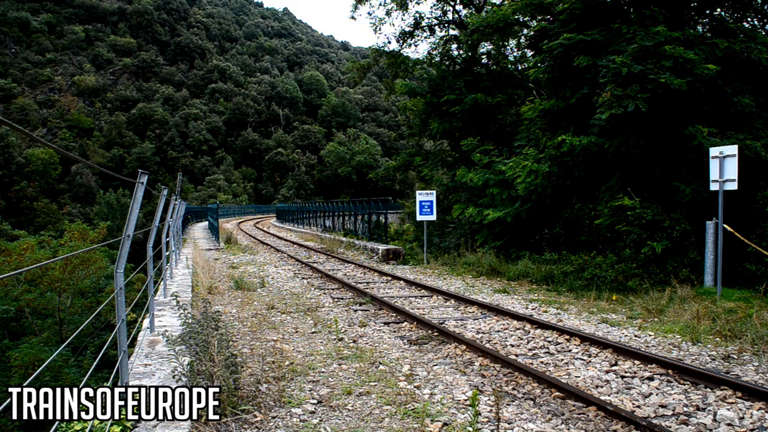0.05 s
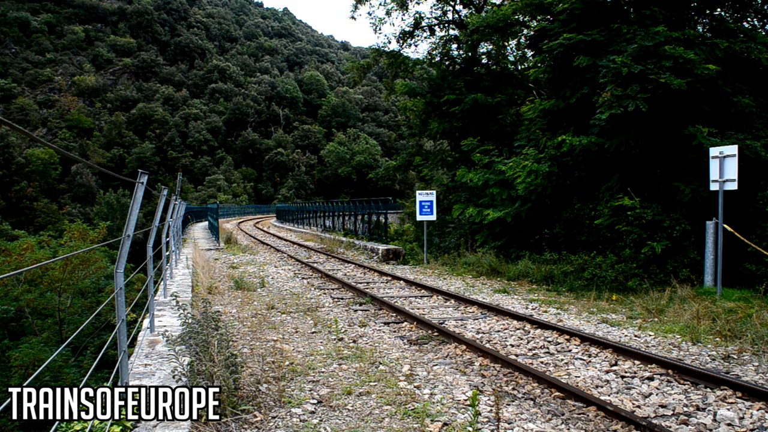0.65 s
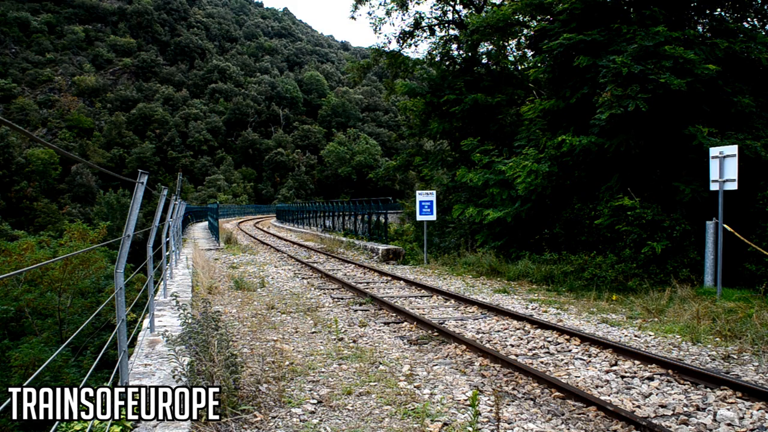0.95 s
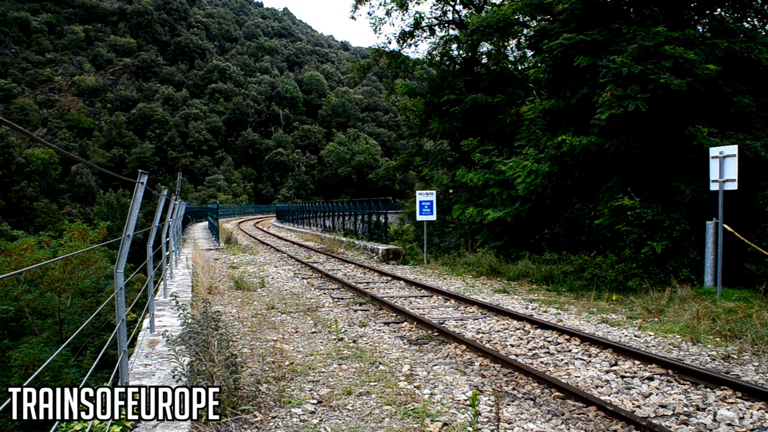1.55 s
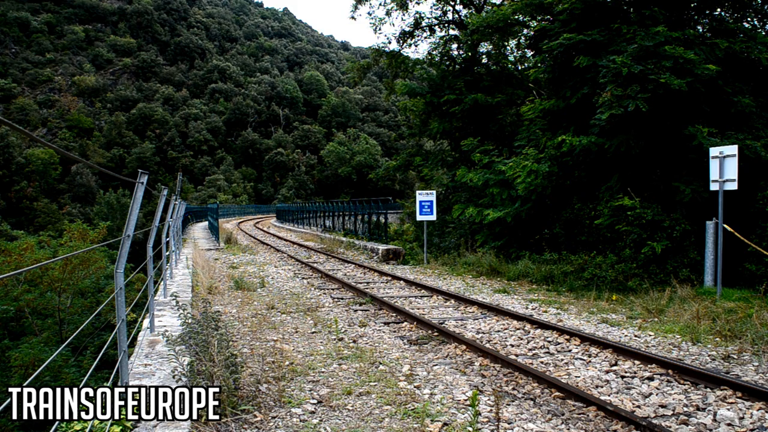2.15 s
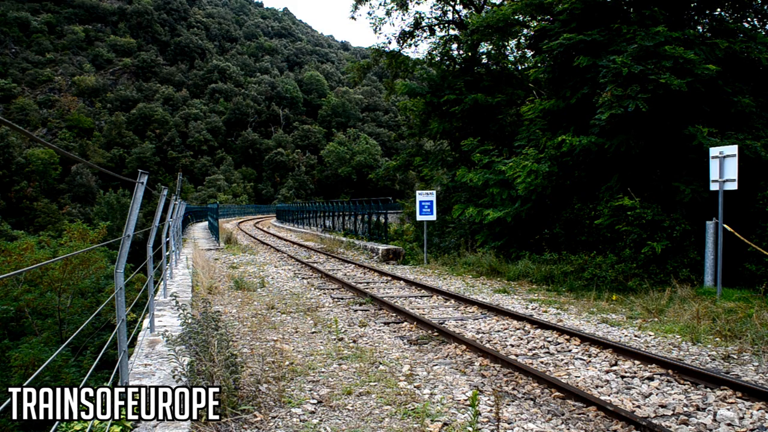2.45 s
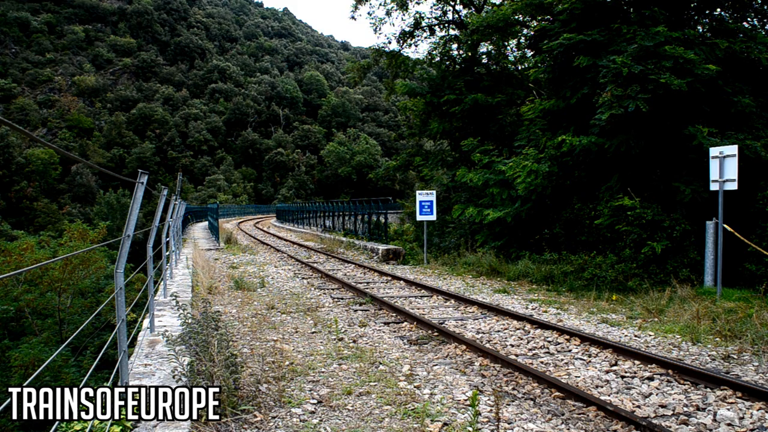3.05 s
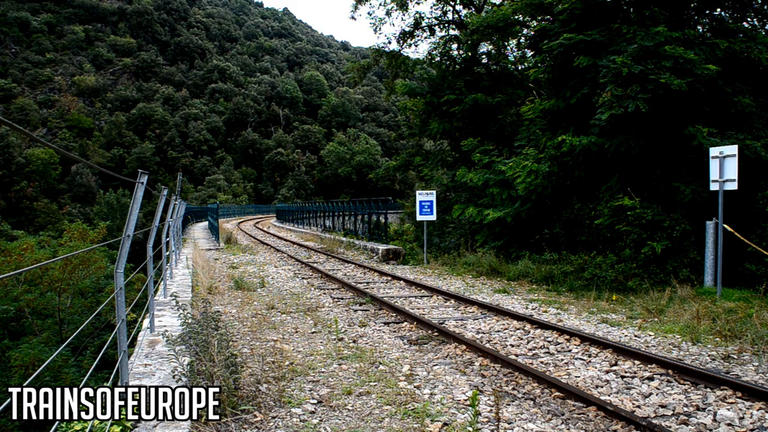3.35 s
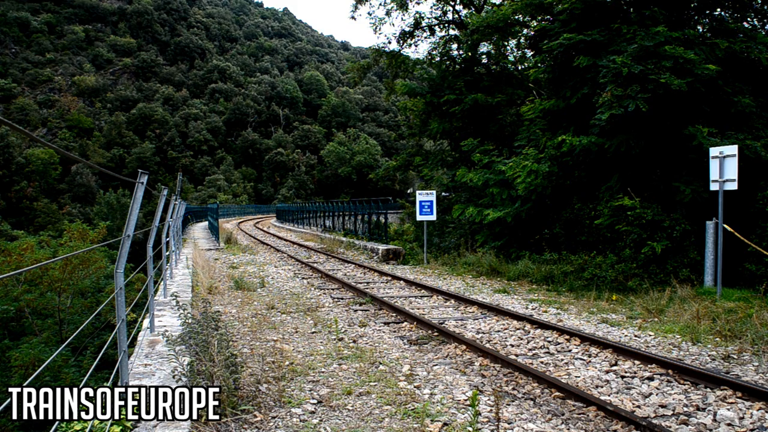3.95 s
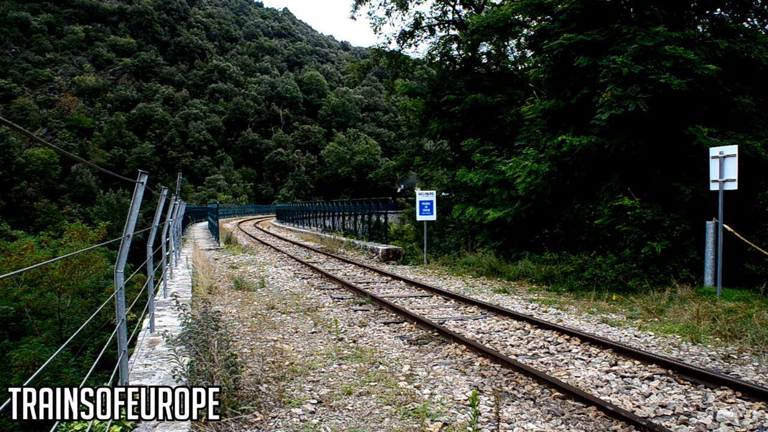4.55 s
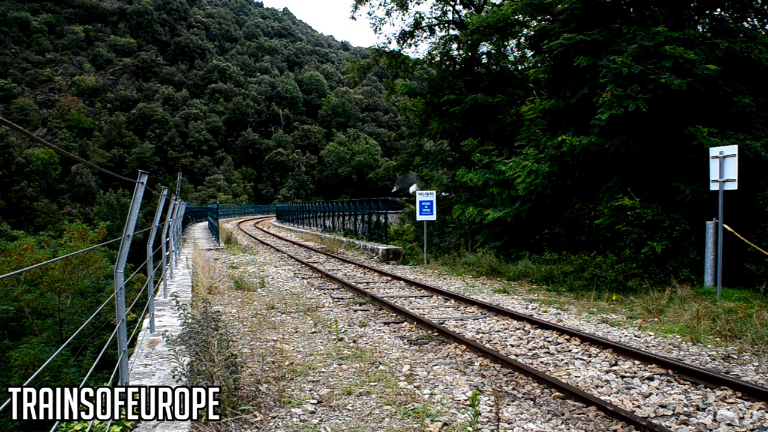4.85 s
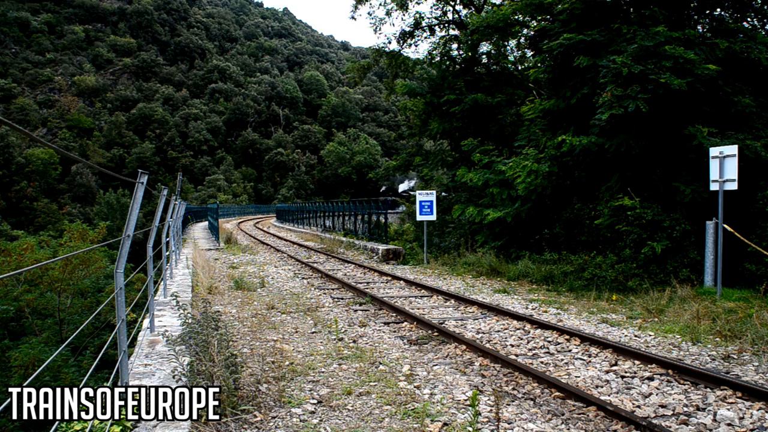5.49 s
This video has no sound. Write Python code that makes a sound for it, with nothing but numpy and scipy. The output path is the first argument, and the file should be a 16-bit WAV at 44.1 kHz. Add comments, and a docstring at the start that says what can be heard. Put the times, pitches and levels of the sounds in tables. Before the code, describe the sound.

From a fixed spot by an outdoor track, a distant steam train is heard as a low, throbbing rumble with rolling wheels and faint, regular metal clanks. It slowly grows louder, and five hissing puffs of steam follow a little past halfway. The locomotive then blows a single, much louder whistle blast, wrapped in rushing steam and wavering with the valley's echo, which lasts to the end.

```python
"""A steam locomotive comes nearer along a wooded valley. First it rumbles, throbs and clanks faintly about
twice a second. From 3.3 s its cylinders let out five puffs of steam over a growing leak. At 4.7 s a steam
jet strikes the whistle's bell (its hollow tube) and blows one long, breathy blast that lasts to the end.
The hillsides echo the moving whistle at a lower pitch (the Doppler effect), so the tone beats, or pulses."""
import sys
import numpy as np
from scipy import signal
from scipy.fft import rfft, irfft, next_fast_len
from scipy.io import wavfile
from scipy.ndimage import uniform_filter1d, minimum_filter1d, map_coordinates

SR = 44100
rng = np.random.default_rng(int(sys.argv[2]) if len(sys.argv) > 2 else 0)


def unload_audio(sound):
    """Save the sound as a 16-bit wav file, at the path given as the first command line argument."""
    columns = np.transpose(np.atleast_2d(sound))
    # keep every value between -1 and 1, then stretch to whole-number steps
    steps = np.round(np.clip(columns, -1, 1) * 32767)
    wavfile.write(sys.argv[1], SR, steps.astype(np.int16))


N = 252252

# How strong each noise is from low to high pitch: f/Hz, relative level/dB
AIR_SPECTRUM = [(3000, 0), (17000, -2)]  # outdoor hiss
RUMBLE_SPECTRUM = [(15, -59), (25, -45), (52, -11.5), (86, -11), (145, -5), (188, -1), (226, -4.5),
                   (265, -2.5), (319, -10), (480, -22), (620, -33), (1060, -120)]  # the running train
ROLLING_SPECTRUM = [(200, -14), (350, 1), (450, -4), (620, 0.5), (760, -4), (980, -1.5), (1150, -5.5),
                    (1500, -7), (2000, -12), (3000, -15), (3750, -19), (4300, -28), (5000, -36),
                    (9000, -53)]  # rolling wheels
CLANK_SPECTRUM = [(300, -18), (1050, 8), (1700, 3.5), (2600, -4), (3900, -11), (5000, -27), (7500, -35),
                  (12000, -50)]  # clanking metal
GUSH_SPECTRUM = [(400, -10.5), (650, -6.5), (1300, -1.5), (2200, -1), (2900, 0), (3700, -1.5), (4300, -8),
                 (5000, -14), (6000, -23), (8000, -55)]  # steam from the cylinders
HISS_SPECTRUM = [(3000, -10), (4200, 7.5), (5000, 4.5), (6500, 1), (8000, -4.5), (10000, -10),
                 (12500, -16.5), (15700, -28)]  # the thin top of that steam
JET_SPECTRUM = [(400, -19.5), (620, -13), (1050, 2.5), (1350, 2), (2150, -2.5), (2850, -1), (3400, -2),
                (3750, -4.5), (4150, -9), (4800, -12.5), (6000, -16.5), (8000, -29), (15000, -46)]  # the whistle's steam jet
FIZZ_SPECTRUM = [(4000, -18), (6500, -1.5), (9000, -5.5), (12500, -11), (14500, -18), (17000, -33)]  # the fizz on top of the jet
BREATH_SPECTRUM = [(600, -24), (700, -10.5), (755, -2.5), (825, -4.5), (860, -6), (930, -26.5)]  # breathy noise around the whistle's note

# The exhaust throbs about once a wheel turn: t/s, added level/dB
EXHAUST_THROBS = [(0.4, 5.5), (0.87, 2.5), (1.36, 5), (1.85, 3.5), (2.44, 4), (2.83, 2), (3.3, 3),
                  (3.85, 5), (4.3, 3.5), (4.84, 3.5), (5.28, 4)]
# The moving parts clank once a wheel turn: t/s, relative peak level/dB
GEAR_CLANKS = [(0.066, -36.5), (0.555, -43.5), (1.066, -37), (1.565, -43), (2.05, -47), (2.542, -32.5),
               (3.025, -35)]
# Puffs from the cylinders: start t/s, hold t/s, relative gush level/dB, relative hiss level/dB
STEAM_PUFFS = [(3.289, 0.09, -33, -60), (3.435, 0.11, -32.5, -59), (3.674, 0.14, -28.5, -51),
               (3.916, 0.047, -32, -62), (4.177, 0.12, -31.5, -49)]
# How loud the jet fizzes: t/s, level/dB
JET_FIZZ = [(4.71, -53), (4.87, -54), (5.06, -54), (5.27, -44.5), (5.47, -46.5), (5.62, -47), (5.7, -41.5)]
# The shrill note of the bell when it is blown too hard: t/s, f/Hz, level/dB
SHRILL_NOTE = [(4.72, 4370, -40.5), (4.82, 4350, -45), (4.855, 4456, -29.5), (4.892, 4435, -39),
               (4.935, 4462, -33.5), (5.15, 4458, -36), (5.5, 4450, -45.5), (5.553, 4580, -32.5),
               (5.588, 4470, -46.5), (5.615, 4520, -31.5), (5.66, 4500, -42)]
# The bell's high notes: pitch as a multiple of the shrill note, jitter f/Hz, added level/dB
HIGH_NOTES = [(0.999, 26.15, 1.5), (1.183, 25.8, -7.5), (1.272, 40, -16)]
# The hillside echo: t/s, Doppler drop f/Hz, level/dB compared with the direct tone
HILL_ECHO = [(4.69, 36.8, -16), (4.9, 24, -8.5), (5.07, 12.3, -5), (5.14, 11, -6), (5.3, 11.8, -3.5),
             (5.42, 22.5, -8), (5.51, 27, -3.5), (5.59, 28, -3.5), (5.72, 7, -13)]
# The whistle's note, sliding up as the valve opens: t/s, f/Hz
WHISTLE_PITCH = [(4.69, 722), (4.73, 802), (4.795, 792), (4.85, 818), (4.9, 809), (5.26, 810), (5.45, 808),
                 (5.55, 814.5), (5.72, 815)]

WHISTLE_START_S = 4.691


def amp(db):
    """Turn decibels into a number to multiply by."""
    return 10 ** (np.asarray(db) / 20)


def unit(x):
    """Scale a signal to an average strength (rms) of 1."""
    return x / np.sqrt(np.mean(np.abs(x) ** 2) + 1e-20)


def clock():
    """The time of every sample, in seconds."""
    return np.arange(N) / SR


def curves(rows):
    """Draw a line through each table column after the time, one value per sample."""
    times, *columns = np.transpose(rows)
    return [np.interp(clock(), times, column) for column in columns]


def opening(start_s, rise_s):
    """A smooth rise from 0 to 1, like a valve opening."""
    return np.sin(np.pi / 2 * np.clip((clock() - start_s) / rise_s, 0, 1)) ** 2


def hump(centre_s, width_s):
    """A smooth swell from 0 to 1 and back."""
    return np.exp(-.5 * ((clock() - centre_s) / width_s) ** 2)


def wobble(rate):
    """A smooth curve through `rate` random values a second."""
    return unit(map_coordinates(rng.standard_normal(8192), [clock() * rate + 2], mode="wrap"))


def phase(hz):
    """The angle a wave has turned through as its pitch moves."""
    return 2 * np.pi * np.cumsum(hz) / SR


def filtered(x, response):
    """Turn each frequency up or down by response(hz)."""
    size = next_fast_len(N + SR // 2)
    return irfft(rfft(x, size) * response(np.fft.rfftfreq(size, 1 / SR)), size)[:N]


def tilted(x, treble_db, corner_hz):
    """Make a sound brighter or duller above corner_hz."""
    treble = filtered(x, lambda hz: hz ** 8 / (hz ** 8 + corner_hz ** 8.))
    return x + treble * (amp(treble_db) - 1)


def gain_at(spectrum, hz):
    """Look up how strong a frequency is in a spectrum table."""
    table_hz, db = np.transpose(spectrum)
    return amp(np.interp(np.log(hz + 1), np.log(table_hz), db, left=-120, right=-120))


def rush(spectrum, patchy_db):
    """Rushing noise of strength 1, with louder and softer patches like swirling air."""
    grid = signal.stft(rng.standard_normal(N), nperseg=512)[2]  # noise split up by pitch and time
    patches = uniform_filter1d(rng.standard_normal(grid.shape), size=6, axis=0)
    patches = unit(uniform_filter1d(patches, size=10, axis=1))
    noise = signal.istft(grid * amp(patchy_db * patches), nperseg=512)[1][:N]
    return unit(filtered(noise, lambda hz: gain_at(spectrum, hz)))


def fuzzy_tone(hz, width_hz):
    """A blurred note rung by swirling air: a narrow band of noise around one pitch."""
    angle = phase(hz)
    return wobble(width_hz) * np.cos(angle) + wobble(width_hz) * np.sin(angle)


def outdoors(hiss_db=-78):
    """A faint, even hiss lies under everything."""
    return amp(hiss_db) * rush(AIR_SPECTRUM, patchy_db=2)


def throb(lag_s, width_s):
    """How many dB each beat of the exhaust adds."""
    return sum(db * hump(s + lag_s, width_s) for s, db in EXHAUST_THROBS)


def rumble(body_db=-35.5, drone_db=-42.5, drone_hz=196, waver_db=0.47):
    """The running train rumbles and drones, swelling with every throb of the exhaust."""
    swell_db = throb(lag_s=0, width_s=0.088) + waver_db * wobble(9)
    drone = amp(drone_db) * fuzzy_tone(np.full(N, drone_hz), width_hz=22)
    body = amp(body_db) * rush(RUMBLE_SPECTRUM, patchy_db=0)
    return amp(swell_db) * (body + drone)


def wheels(roll_db=-40, grows_db_per_s=0.72, brightens_db_per_s=0.67, rattle_db=0.5):
    """Rolling wheels get louder and brighter as they come nearer, with a soft chuff at each throb."""
    nearing_s = np.minimum(clock(), 3.3) - 1.5  # the growth stops at 3.3 s
    chuff_db = 0.4 * throb(lag_s=0.007, width_s=0.03)
    level_db = roll_db + grows_db_per_s * nearing_s + rattle_db * wobble(18) + chuff_db
    rolling = rush(ROLLING_SPECTRUM, patchy_db=1)
    return amp(level_db) * tilted(rolling, brightens_db_per_s * nearing_s, corner_hz=1300)


def clanks(gain_db=-0.5, rise_s=0.015, ring_s=0.26):
    """The moving parts knock once a wheel turn; each knock fades by 60 dB in ring_s."""
    knocks = sum(amp(db - 60 * np.abs(clock() - s) / ring_s) * opening(s - rise_s, rise_s)
                 for s, db in GEAR_CLANKS)
    return amp(gain_db) * knocks * rush(CLANK_SPECTRUM, patchy_db=-1.3)


def puff(start_s, hold_s, rise_s, fall_db_per_s):
    """The loudness of one puff: it rises, holds and dies away."""
    return opening(start_s, rise_s) * amp(-fall_db_per_s * np.maximum(clock() - start_s - hold_s, 0))


def cylinder_steam(leak_db_per_s=4, hiss_db_per_s=8.5, hiss_gain_db=4, sputter_db=0.34):
    """The cylinders' drain taps open: a thin hiss, then gushing puffs over a growing leak."""
    leaking_s = np.minimum(clock(), WHISTLE_START_S) - STEAM_PUFFS[0][0]
    gush_power = amp(-38.5 + leak_db_per_s * leaking_s) ** 2
    hiss_power = amp(-64 + hiss_db_per_s * leaking_s) ** 2
    for start_s, hold_s, gush_db, hiss_db in STEAM_PUFFS:
        gush_power += (amp(gush_db) * puff(start_s, hold_s, rise_s=0.03, fall_db_per_s=66)) ** 2
        hiss_power += (amp(hiss_db) * puff(start_s, hold_s, rise_s=0.05, fall_db_per_s=42.5)) ** 2
    flow_db = 10 * np.log10(gush_power)
    treble_db = 0.99 * (flow_db + 27.5)  # more steam sounds brighter
    gush = tilted(rush(GUSH_SPECTRUM, patchy_db=0.97), treble_db, corner_hz=4300)
    gush *= amp(flow_db) * opening(3.295, 0.012)
    hiss = amp(hiss_gain_db) * np.sqrt(hiss_power) * opening(3.26, 0.03) * rush(HISS_SPECTRUM, 0)
    return amp(-sputter_db * wobble(20)) * (gush + hiss)


def pressure(build_s=0.67):
    """Steam pressure in the whistle: 0 as it starts to sound, 1 at full blast."""
    return opening(WHISTLE_START_S, build_s)


def bell_note(hz, jitter_hz):
    """One high note of the whistle's bell: a shaky pitch wrapped in noise."""
    note = np.sqrt(2) * np.sin(phase(hz + jitter_hz * wobble(180)))
    return unit(note + amp(-1) * fuzzy_tone(hz, width_hz=190))


def whistle_steam(full_db=-24, swell_db=3.5, sputter_db=2, hoarse_ratio=0.826):
    """The jet roars across the bell's edge, louder with pressure, and sets its high notes ringing."""
    jet_db = full_db + swell_db * (pressure() - 1)
    fizz_db, = curves(JET_FIZZ)
    shrill_hz, shrill_db = curves(SHRILL_NOTE)
    roar = amp(jet_db) * opening(4.655, 0.067) * rush(JET_SPECTRUM, patchy_db=1)
    fizz = amp(fizz_db) * opening(4.66, 0.12) * rush(FIZZ_SPECTRUM, patchy_db=2)
    notes = sum(amp(db) * bell_note(ratio * shrill_hz, jitter) for ratio, jitter, db in HIGH_NOTES)
    shrill = amp(shrill_db + sputter_db * wobble(30)) * opening(4.7, 0.04) * notes
    # a lower, hoarse note builds up slowly with the pressure
    hoarse_gain = amp(jet_db - 12 + sputter_db * wobble(20)) * opening(4.79, 0.28)
    hoarse = hoarse_gain * bell_note(hoarse_ratio * shrill_hz, jitter_hz=22)
    return roar + fizz + shrill + hoarse


def whistle_tone(full_db=-9.3, swell_db=7, flutter_hz=1.74, second_db=-28, third_db=-32,
                 jitter_hz=4.5, far_drop_hz=42, breath_db=-28):
    """The bell's note swells with pressure and beats against its lower echoes from the hillsides."""
    pitch_hz, = curves(WHISTLE_PITCH)
    drop_hz, echo_db = curves(HILL_ECHO)
    below_full = pressure() - 1
    direct = phase(pitch_hz + flutter_hz * wobble(60))
    lag = phase(drop_hz * (clock() > WHISTLE_START_S))  # how far the echo's wave falls behind
    tone = amp(full_db + swell_db * below_full) * (np.sin(direct) + amp(echo_db) * np.sin(direct - lag))
    # overtones at 2 and 3 times the pitch; the lower one flares while the note settles
    flare_db = 7 * hump(4.772, 0.025)
    for multiple, db in [(2, second_db + flare_db), (3, third_db)]:
        angle = multiple * direct + phase(jitter_hz * wobble(150))
        with_echo = np.sin(angle) + amp(echo_db - 7) * np.sin(angle - multiple * lag)
        flicker_db = (multiple - 1) * 1.62 * wobble(35)
        fade_in = opening(WHISTLE_START_S, rise_s=(multiple - 1) * 0.023)
        tone += fade_in * amp(db + 2 * below_full + flicker_db) * with_echo
    # another slope answers lower still: a fast beat that roughens the start of the blast
    far_lag = phase(far_drop_hz + 7 * wobble(14))
    far_echo = opening(WHISTLE_START_S, 0.16) * amp(-20.5 - 9 * pressure()) * np.sin(direct - far_lag)
    # swirling steam rings the bell around its note and makes it breathy
    breath = amp(breath_db) * rush(BREATH_SPECTRUM, patchy_db=2)
    valve = opening(WHISTLE_START_S, 0.011)
    return valve * (np.sqrt(2) * (tone + far_echo) + breath)


def scene():
    """All the sounds add up at one spot beside the track."""
    background = outdoors() + rumble() + wheels() + clanks()
    return (background + cylinder_steam() + whistle_tone() + whistle_steam())[None]


def record(dry, peak_limit=0.93, top_hz=15700):
    """The level dips smoothly around the loudest peaks, and the very highest treble is cut off."""
    needed_gain = np.minimum(1, peak_limit / (np.abs(dry) + 1e-9))
    smooth_gain = uniform_filter1d(minimum_filter1d(needed_gain, size=441), size=441)  # 10 ms each
    return np.array([filtered(channel, lambda hz: hz < top_hz) for channel in dry * smooth_gain])


dry = scene()
out = record(dry)
unload_audio(out)
```